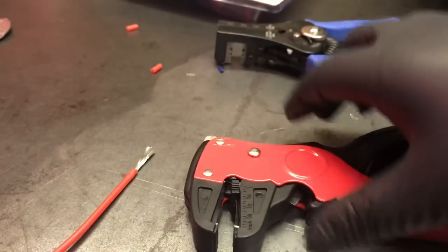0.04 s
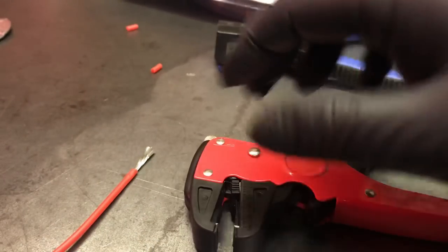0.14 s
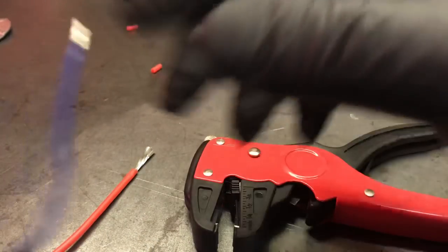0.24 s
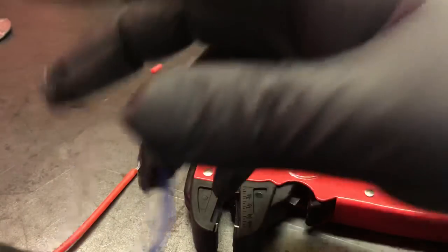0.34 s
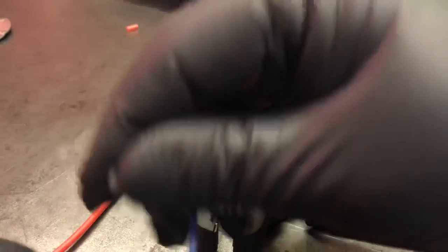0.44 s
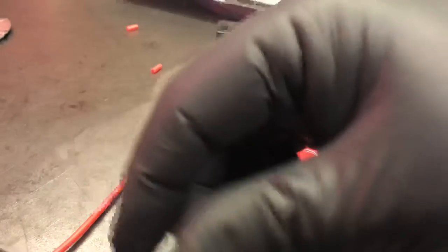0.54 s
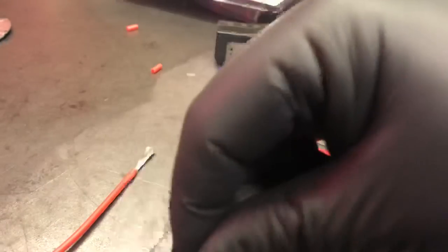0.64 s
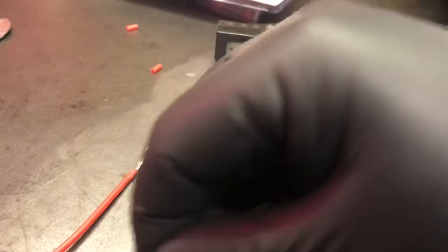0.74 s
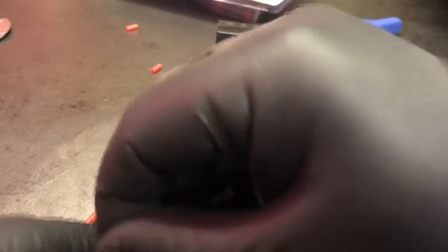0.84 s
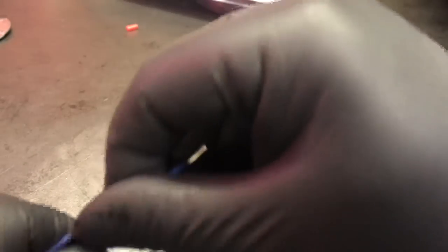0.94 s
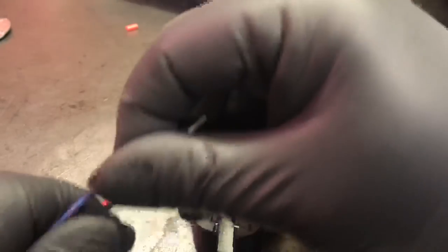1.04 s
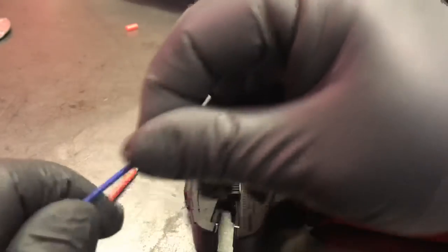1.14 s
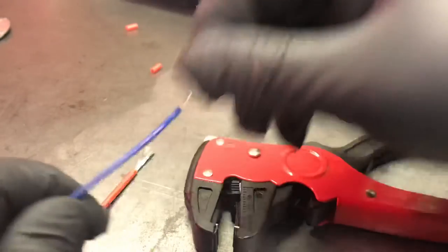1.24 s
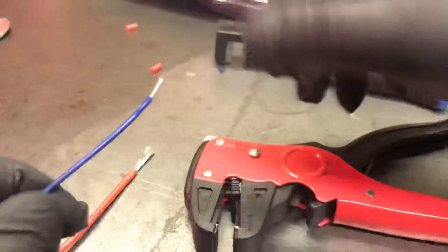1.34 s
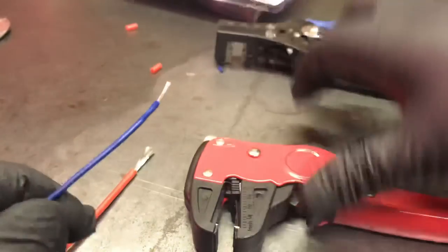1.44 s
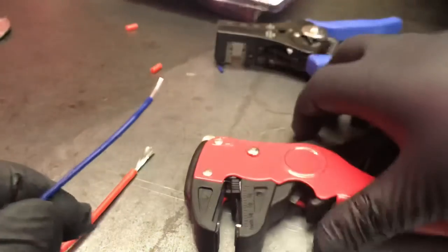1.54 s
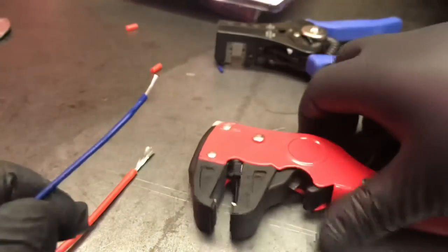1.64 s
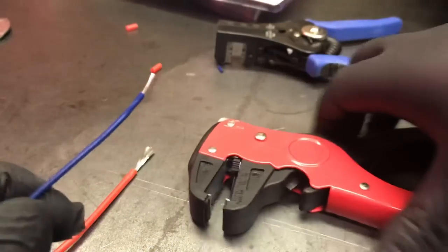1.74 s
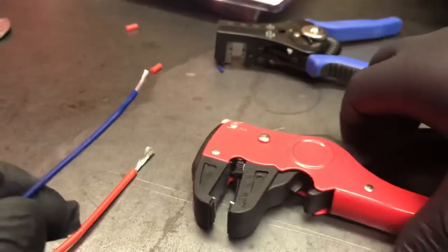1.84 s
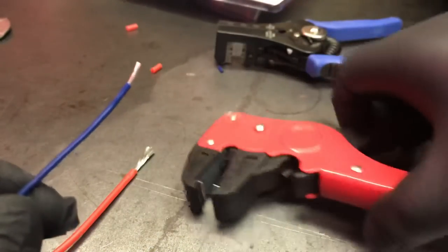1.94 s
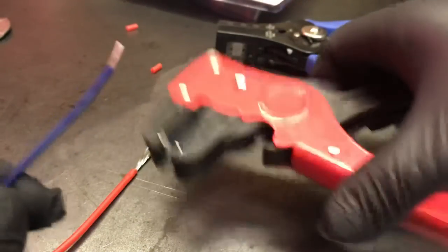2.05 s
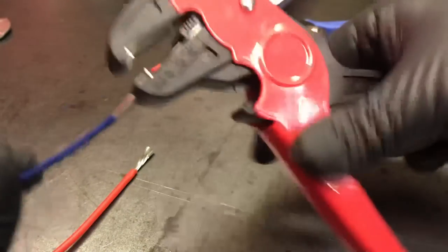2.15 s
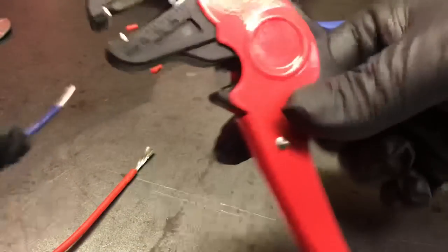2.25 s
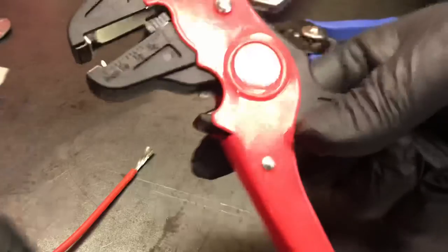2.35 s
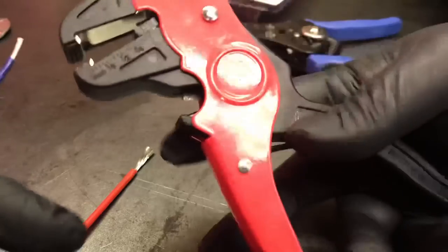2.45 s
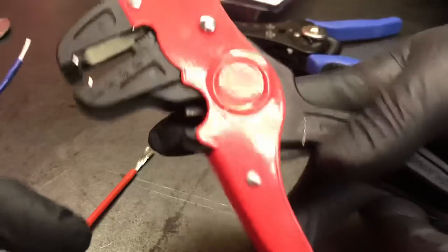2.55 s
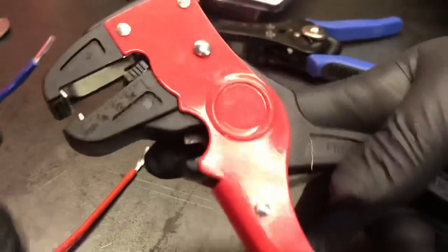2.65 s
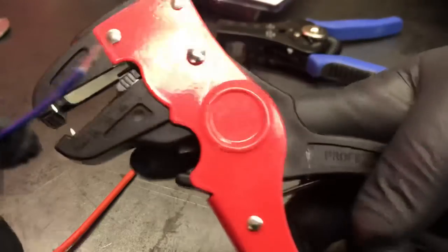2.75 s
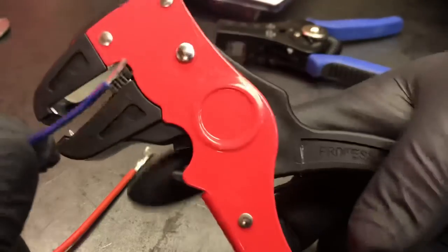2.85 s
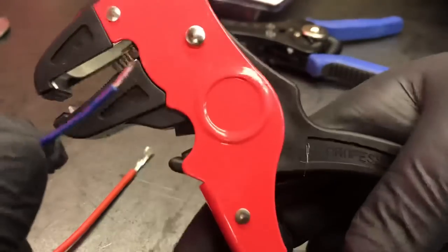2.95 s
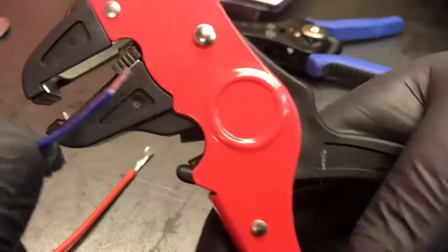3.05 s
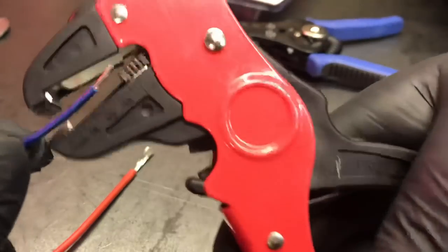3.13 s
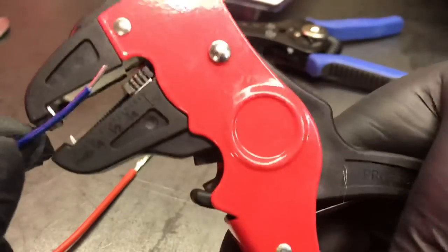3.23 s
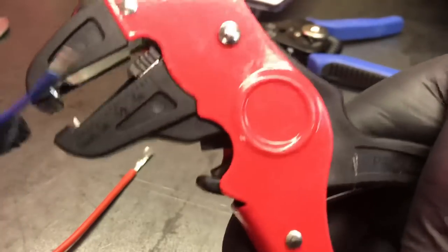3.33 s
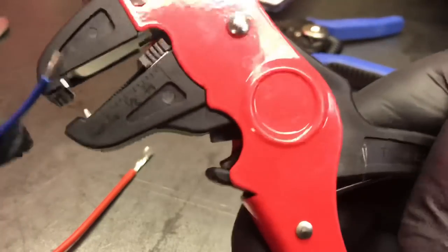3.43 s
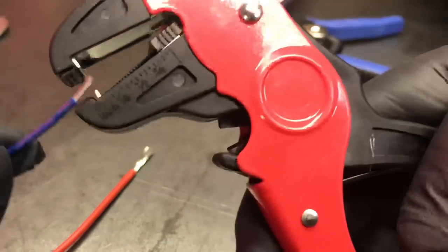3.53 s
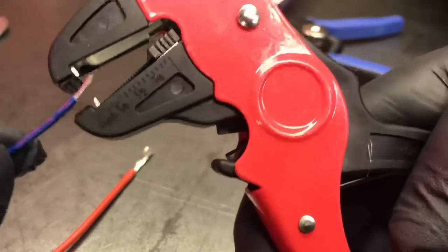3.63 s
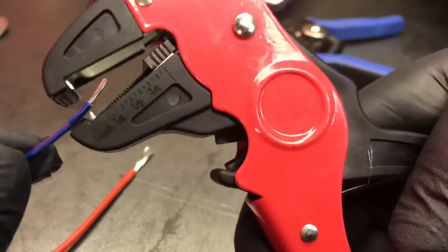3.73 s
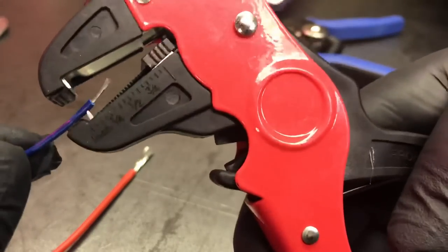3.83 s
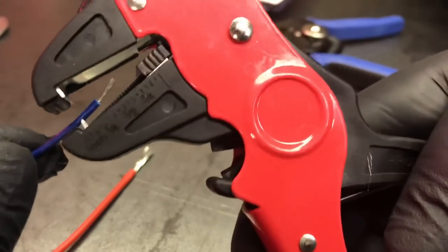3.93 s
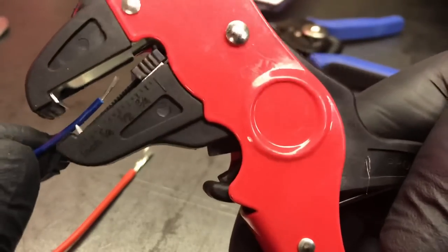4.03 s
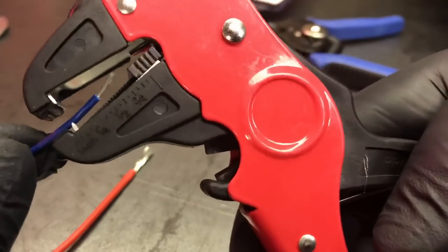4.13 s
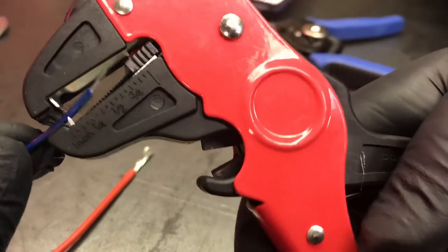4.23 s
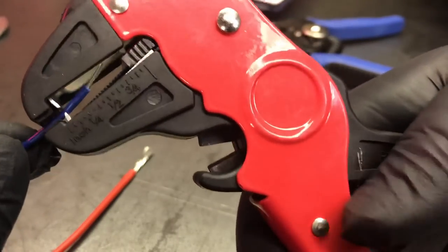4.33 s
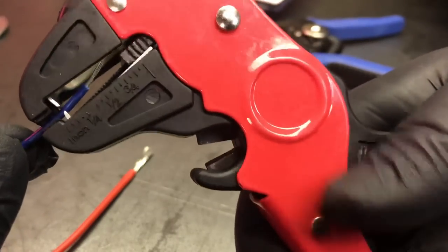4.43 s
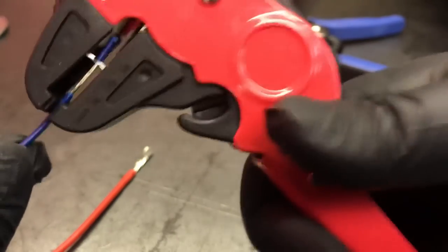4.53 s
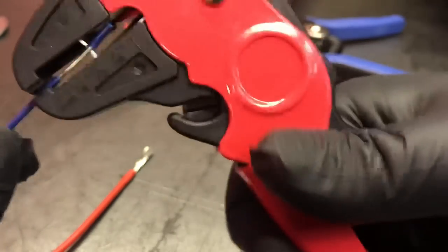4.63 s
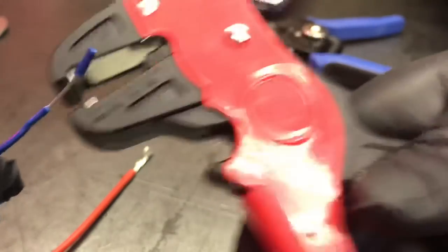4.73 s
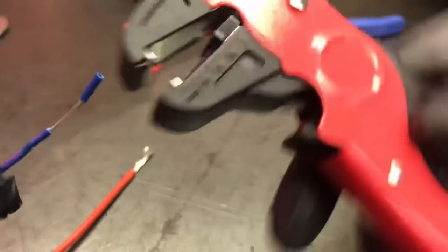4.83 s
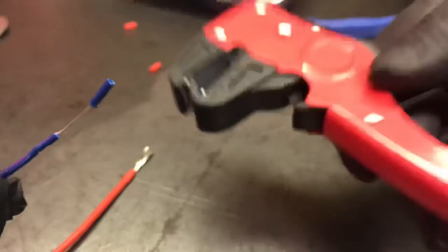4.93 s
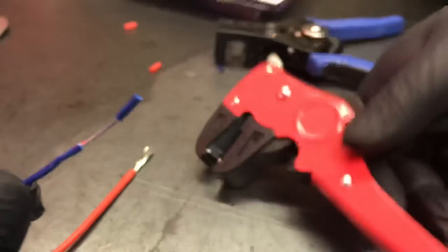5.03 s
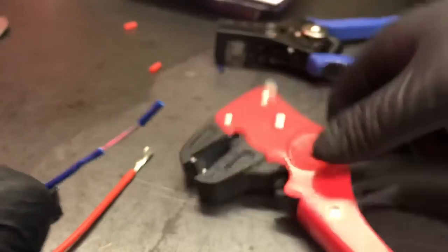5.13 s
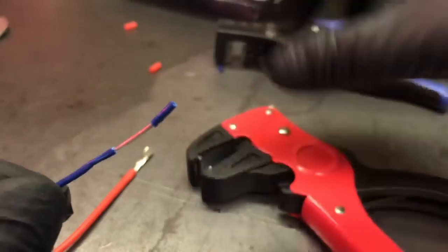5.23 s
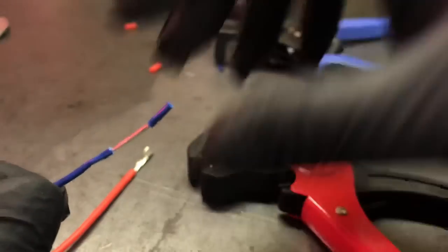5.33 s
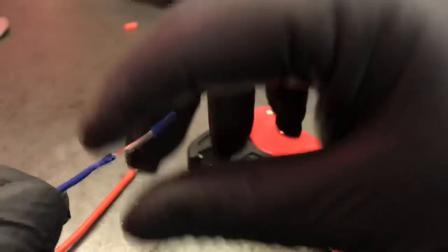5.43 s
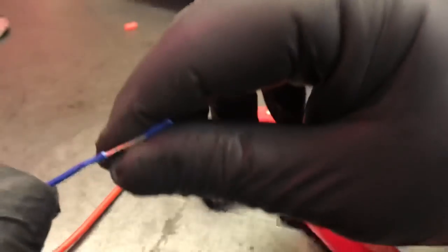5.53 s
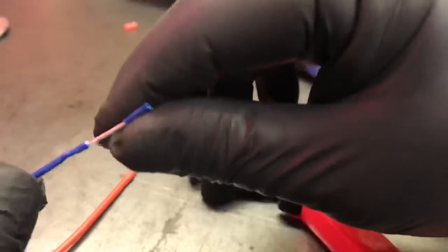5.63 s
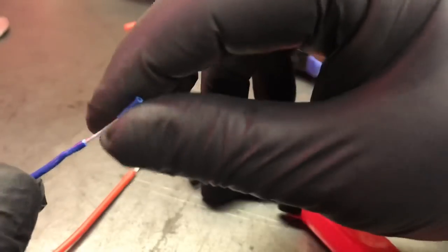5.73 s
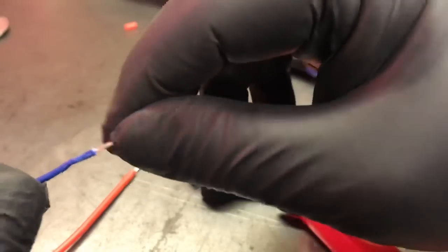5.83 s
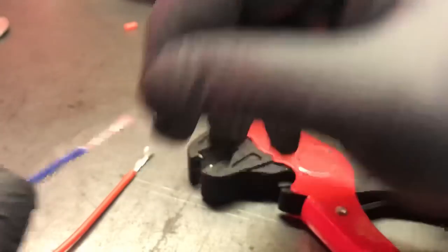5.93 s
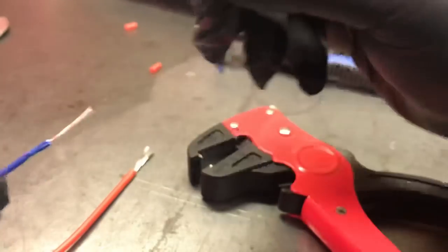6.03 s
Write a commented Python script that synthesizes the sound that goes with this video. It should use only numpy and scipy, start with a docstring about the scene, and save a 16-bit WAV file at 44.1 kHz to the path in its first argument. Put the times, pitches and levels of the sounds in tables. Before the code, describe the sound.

Light clicks and glove rustling, then two sharp clacks from a hand wire stripper and a clatter as it is set down.

```python
"""Stripping a wire at a workbench

Gloved hands twist a wire, lift a plastic and steel wire stripper, strip the wire and lay the tool down.
Rubber gloves rustle and scrape in tiny snaps, and wire ends tick. Jaws, latch and handles ring
briefly as they knock together, and the bench thuds under them. A lamp hums in the small, quiet workshop."""
import sys
import numpy as np
from scipy import signal
from scipy.fft import rfft, irfft, next_fast_len
from scipy.io import wavfile
from scipy.ndimage import uniform_filter1d

SR = 44100
rng = np.random.default_rng(int(sys.argv[2]) if len(sys.argv) > 2 else 0)


def pcm_store(signal):
    """Save signal as 16-bit PCM."""
    levels = np.round(np.clip(np.atleast_2d(signal), -1, 1) * 32767)
    wavfile.write(sys.argv[1], SR, levels.astype(np.int16).T)


N = 267951

# The tone of the still air. Each row: frequency in Hz, relative level in dB.
AIR_TONE = [(15, -48), (25, 0), (185, -9), (363, -11.5), (439, -17.5), (2690, -25.5), (13600, -50),
            (16000, -40.5)]
# The lamp's hum. Each row: pitch in Hz, level in dB that it wavers around.
LAMP_TONES = [(242.2, -66.5), (360.7, -73)]
# The gloves' constant faint rustle. Each row: time in seconds, level in dB.
RUSTLE_LEVELS = [(0, -60), (0.16, -61.5), (0.8, -61), (1.1, -63.5), (1.6, -57.5), (2.1, -55.5),
                 (2.6, -52.5), (2.75, -69), (3.07, -67.5), (3.35, -61.5), (3.55, -74.5), (4.51, -71),
                 (4.57, -50.5), (4.82, -46.5), (4.93, -56.5), (5.35, -52.5), (5.5, -61), (5.9, -70.5)]
# The bands of noise that rubber folds make. Each row: centre in Hz, relative level in dB.
GLOVE_FOLDS = [(1900, -14.5), (2600, -12.5), (3600, -6), (4900, -7.5), (6500, -6), (8800, -7.5),
               (11500, -8.5), (14500, -2.5)]
# A glove rubs wire, grip or the other glove. Each row: start in seconds, length in seconds, level in dB.
GLOVE_RUBS = [(0.055, 0.064, -44), (0.254, 0.22, -55.5), (0.488, 0.13, -60.5), (0.7, 0.065, -55),
              (0.796, 0.079, -39.5), (0.945, 0.11, -52.5), (1.096, 0.3, -64), (1.63, 0.14, -48),
              (1.851, 0.052, -50.5), (2.173, 0.11, -46.5), (2.444, 0.16, -53), (2.773, 0.14, -47.5),
              (2.947, 0.11, -52), (4.925, 0.11, -65), (5.972, 0.095, -58.5)]
# Tool and gloves scrape, squeak and creak.
# Each row: start in seconds, length in seconds, centre in Hz, width in octaves, level in dB.
SCRAPE_STROKES = [(0.062, 0.076, 1320, 2, -47), (0.616, 0.53, 1225, 0.16, -62),
                  (0.636, 0.47, 1900, 0.25, -61.5), (0.87, 0.08, 890, 1, -50), (1.65, 0.19, 1760, 1.3, -46),
                  (1.677, 0.11, 4700, 0.3, -49), (1.797, 0.065, 680, 1.1, -51),
                  (1.897, 0.14, 670, 0.42, -54), (1.858, 0.37, 3200, 1.9, -48.5),
                  (2.012, 0.087, 1980, 0.12, -43), (2.021, 0.038, 3900, 1.04, -39),
                  (2.246, 0.19, 900, 1.55, -43.5), (2.26, 0.16, 2410, 0.16, -45),
                  (2.438, 0.19, 2970, 2.8, -51.5), (2.619, 0.17, 2490, 1.5, -61),
                  (2.835, 0.087, 2980, 2.1, -47.5), (2.998, 0.064, 1900, 1.34, -52),
                  (3.321, 0.093, 1230, 0.77, -53.5), (3.325, 0.048, 2080, 0.11, -47),
                  (3.336, 0.12, 2830, 0.13, -58.5), (3.387, 0.19, 2720, 0.56, -63),
                  (4.033, 0.14, 433, 0.53, -57), (4.616, 0.18, 3900, 0.34, -57.5),
                  (4.72, 0.034, 6130, 0.31, -54), (4.956, 0.098, 3160, 0.37, -54.5),
                  (5.2, 0.13, 3500, 1.24, -35.5), (5.384, 0.074, 1730, 1.6, -50),
                  (5.386, 0.15, 217, 0.77, -58), (5.458, 0.43, 1203, 1, -62.5)]
# The tones at which the tool rings. Each row: pitch in Hz, relative level in dB.
TOOL_TONES = [(700, -10.5), (1140, -15), (1500, -2), (1770, -10.5), (2100, 1), (2350, -1.5), (2900, 2),
              (3300, 6.5), (3900, 5.5), (4450, 5), (5300, 3.5), (5900, 7.5), (7250, 5), (9000, 5.5)]
# The tone of the bench when scraping shakes it. Each row: frequency in Hz, relative level in dB.
RUMBLE_TONE = [(30, -12), (150, -2.5), (300, 2.5), (700, -15.5)]
# Wire ends and glove folds tick. Each row: start in seconds, level in dB, pitch in Hz.
SMALL_TICKS = [(0.111, -45, 1000), (0.202, -50, 1200), (0.323, -47, 894), (0.514, -54, 4000),
               (0.526, -41.5, 2470), (0.856, -33, 6500), (0.863, -38, 3300), (0.8855, -32, 3050),
               (0.926, -41, 5100), (0.943, -37, 4150), (1.355, -48, 5030), (1.597, -34, 4470),
               (1.6134, -42, 6200), (2.588, -34.5, 6100), (2.656, -41, 7140), (3.199, -44.5, 3660),
               (3.347, -46, 9500), (3.389, -47, 7000), (3.562, -43.5, 3430), (3.599, -52.5, 3170),
               (3.636, -54, 6850), (3.7184, -53, 3170), (3.851, -50, 3550), (3.8715, -48.5, 2700),
               (4.1456, -53.5, 2530), (4.198, -52, 1570), (4.2285, -53.5, 2300), (4.361, -45, 1930),
               (4.5552, -45, 6170), (5.886, -54.5, 5010)]
# Grip and wire bump the bench. Each row: start in seconds, level in dB, pitch in Hz.
SOFT_BUMPS = [(0.868, -42, 82), (0.928, -32.5, 186), (1.597, -36, 60), (1.807, -28, 222), (1.924, -33, 252),
              (2.532, -34, 88.5), (3.325, -23.5, 227), (4.03, -42, 120), (4.613, -19.5, 122),
              (5.46, -34, 110), (5.519, -32.5, 95.5), (5.679, -34.5, 123)]
# The tool knocks, snaps and bounces. Each row: start in seconds, level in dB, pitch in Hz where it rings
# most, fade time there in milliseconds, then treble crack and bench thud, both in dB from that level.
TOOL_BLOWS = [(1.587, -36, 4630, 120, -18, -12), (1.9217, -32.5, 1900, 53, -28, -9.5),
              (2, -14.5, 2070, 19, -5.5, -26.5), (2.0564, -10, 1370, 30, -13.5, -27.5),
              (2.0658, -15, 1357, 61, -40, -18.5), (2.2402, -9, 1770, 53, -17, -21),
              (2.3521, -19, 3000, 13, -15, -27), (2.8204, -24.5, 1410, 61, -25, -13.5),
              (3.1447, -21.5, 3630, 9.7, 1.5, -63), (3.322, -27.5, 1310, 30, -59, -10),
              (4.3759, -35.5, 2170, 26, -42, -35), (4.6034, -12, 6500, 43, 8, -24),
              (4.6058, -4, 2340, 28, -12.5, -23), (4.61, -3.5, 2540, 54, -14, -30),
              (4.6138, -6.5, 9000, 28, -2, -40), (4.7623, -15.5, 2100, 30, -16.5, -36),
              (4.7801, -13, 2490, 50, -13.5, -36.5), (4.787, -13, 3940, 23, -0.5, -47.5),
              (4.7923, -18, 3900, 30, -8, -42.5), (4.7968, 0, 6230, 37, -5, -42.5),
              (4.8, -4, 2510, 43, -11.5, -36.5), (5.1444, -0.5, 4430, 35, -9, -27.5),
              (5.1487, -10.5, 4300, 40, -15.5, -7.5), (5.193, -2.5, 1500, 54, -5.5, -20),
              (5.2175, -15.5, 3900, 51, -15.5, -22.5), (5.2659, -1.5, 2210, 67, -2.5, -10),
              (5.274, -3, 1880, 37, -13.5, -26.5), (5.322, -15, 1600, 29, -32.5, -24),
              (5.3336, 0.5, 1930, 62, -8.5, -18.5), (5.3582, -6, 2020, 37, -12, -19.5),
              (5.365, -8.5, 1770, 50, -19.5, -23), (5.38, -15, 3900, 30, -4.5, -13.5)]
# The tones of the struck bench. Each row: pitch in Hz, relative level in dB, fade time in seconds.
BENCH_TONES = [(74.3, -7, 0.19), (108, -13, 0.076), (158, -5, 0.11), (226, 4, 0.06), (323.3, -5.5, 0.1),
               (371.2, -10.5, 0.11), (645.6, -15.5, 0.12)]
# How long the room echoes. Each row: frequency in Hz, fade time in seconds.
ECHO_TIMES = [(100, 0.99), (1500, 0.47), (10000, 0.021)]


def gain(db):
    """Turn decibels into a number to multiply by."""
    return 10 ** (np.asarray(db) / 20)


def fade(t, fade_time):
    """Die away smoothly; the fade time is how long it takes to drop 60 dB."""
    return np.exp(-np.log(1000) * t / fade_time)


def rise(t, rise_time):
    """Climb quickly from 0 towards 1, softening the start of a sound."""
    return 1 - np.exp(-t / rise_time)


def swell(count, skew, edge):
    """Rise and fall once: skew under 1 peaks early, over 1 late; a larger edge softens the ends."""
    return np.sin(np.pi * np.linspace(0, 1, count) ** skew) ** edge


def wander(per_second):
    """Glide between random values, mostly within -1 to 1, for the whole scene."""
    step = int(SR / per_second)
    return uniform_filter1d(np.repeat(rng.standard_normal(N // step + 1), step), step)[:N]


def colour(sound, points):
    """Shape a sound's tone along (Hz, dB) points, then set its average (rms) level to 1."""
    hz, db = np.transpose(points)
    size = next_fast_len(len(sound))
    freqs = np.maximum(np.fft.rfftfreq(size, 1 / SR), 1)
    curve_db = np.interp(np.log(freqs), np.log(hz), db, left=-80, right=-80)
    shaped = irfft(rfft(sound, size) * gain(curve_db), size)[:len(sound)]
    return shaped / np.sqrt(np.mean(shaped ** 2))


def grains(count, per_second, spread_db):
    """Surfaces stick and slip, making tiny snaps of uneven size over a hiss."""
    snaps = rng.random(count) < per_second / SR
    sizes = gain(spread_db * np.minimum(rng.exponential(size=count), 4))
    return (1 + snaps * sizes) * rng.standard_normal(count)


def ring(t, hz, gains, fade_time, chatter):
    """A struck object sounds several fading tones; chattering joints make each one flutter."""
    detune = 1 + 0.031 * rng.standard_normal(hz.shape)
    waves = np.sin(2 * np.pi * (hz * detune * t + rng.random(hz.shape))) * fade(t, fade_time)
    flutter = 8 * uniform_filter1d(rng.standard_normal(waves.shape), size=64, axis=1)
    return (gains * waves * (1 + chatter * flutter)).sum(axis=0)


def add(out, start, sound):
    """Mix a short sound in at a start time in seconds."""
    first = int(start * SR)
    out[first:first + len(sound)] += sound[:N - first]


def lamp_hum():
    """The lamp hums at multiples of the mains frequency, wavering a little."""
    out, t = np.zeros(N), np.arange(N) / SR
    for hz, db in LAMP_TONES:
        level = np.sqrt(2) * gain(db + 4 * wander(22))
        out += level * np.sin(2 * np.pi * (hz * t + 0.14 * wander(22)))
    return out


def still_air():
    """The workshop's air is a faint, steady, mostly low noise."""
    return colour(rng.standard_normal(N), AIR_TONE) * gain(-60.5)


def glove_rustle():
    """Rubber crackles finely; its tone shifts as folds open, and each rub makes it louder."""
    shared = 0.8 * grains(N, per_second=900, spread_db=4.5)
    folds = np.zeros(N)
    for hz, db in GLOVE_FOLDS:
        crackle = shared + grains(N, per_second=250, spread_db=6.5)  # each fold adds its own snaps
        band = [(hz / 2, -28), (hz / 1.15, -9), (hz, 0), (hz * 1.15, -9), (hz * 2, -28)]
        folds += colour(crackle, band) * gain(db + 3.9 * wander(9) + 2.5 * wander(40))
    motion = gain(np.interp(np.arange(N) / SR, *np.transpose(RUSTLE_LEVELS)))
    for start, length, db in GLOVE_RUBS:
        add(motion, start, gain(db) * swell(int(length * SR), skew=1.13, edge=0.75))
    return folds / 2 * motion * gain(2 * wander(70))


def scrapes():
    """Each scrape is gritty noise around one pitch that wakes its own mix of the tool's tones."""
    out, tool_hz = np.zeros(N), np.array(TOOL_TONES)[:, :1]
    unsteady = gain(2.5 * wander(160))
    freqs = np.geomspace(100, 15000, 300)
    tool_peaks = np.exp(-(np.log2(freqs / tool_hz) / 0.02) ** 2)
    for start, length, hz, width, db in SCRAPE_STROKES:
        count = int(length * SR)
        peaks_db = (10 * rng.random(tool_hz.shape) * tool_peaks).sum(axis=0)
        band_db = np.maximum(-6 * (np.log2(freqs / hz) / width) ** 2, -60)
        grit = colour(grains(count, per_second=900, spread_db=3.7), np.c_[freqs, band_db + peaks_db])
        add(out, start, gain(db) * swell(count, skew=0.6, edge=0.9) * grit)
    return out * unsteady


def bench_rumble(scraping):
    """Whatever scrapes also shakes the bench, so a low noise follows its loudness."""
    push = uniform_filter1d(abs(scraping), size=2000)
    return colour(rng.standard_normal(N), RUMBLE_TONE) * push * gain(-2.5 + wander(24))


def ticks():
    """Wire ends and glove folds give dry clicks; stronger ones spread further from their pitch."""
    out, t = np.zeros(N), np.arange(SR // 20) / SR
    for start, db, hz in SMALL_TICKS:
        sides_db = min(1.3 * (db + 27.5), -2)
        band = [(hz / 3, sides_db), (hz, 0), (hz * 1.4, 0.45 * sides_db), (16000, sides_db)]
        click = colour(rng.standard_normal(len(t)), band)
        add(out, start, gain(db) * click * fade(t, 0.019) * rise(t, 0.00031))
    return out


def bumps():
    """Grip and wire land softly on the bench, each making a few slow swings of a low tone."""
    out, t = np.zeros(N), np.arange(SR // 4) / SR
    for start, db, hz in SOFT_BUMPS:
        cycles = hz * t
        add(out, start, gain(db) * np.sin(2 * np.pi * cycles) * fade(cycles, 9.2) * rise(cycles, 0.78))
    return out


def tool_clack(hz, fade_time, crack_db):
    """A blow rings the tool, favouring tones near one pitch, and loose parts rattle on for a moment."""
    t = np.arange(SR // 10) / SR
    tool_hz, tool_db = np.transpose(TOOL_TONES)[:, :, None]
    octaves = np.log2(tool_hz / hz)
    near = np.exp(-(octaves / 0.17) ** 2)  # 1 at the blow's pitch, 0 far from it
    # a soft blow with little crack pings more clearly and reaches the high tones less
    chatter = 1.1 - near * np.clip(-crack_db / 30, 0, 0.7)
    strength = near + 0.44 * gain(0.3 * crack_db * np.maximum(octaves, 0))
    fade_times = fade_time * (0.74 + 0.26 * near)  # far tones die sooner
    body = ring(t, tool_hz, strength * gain(tool_db), fade_times, chatter) * rise(t, 0.00021)
    body *= 1 + 0.74 * fade(t, 0.11 * fade_time)  # strongest while the parts still touch
    bright_hiss = signal.lfilter([1, -0.6], [1], rng.standard_normal(len(t)))
    rattle = bright_hiss * (fade(t, 0.32 * fade_time) + gain(-22.5) * fade(t, 2.5 * fade_time))
    return body / abs(body).max() + gain(crack_db) * rattle


def bench_thud():
    """The bench rings low, in a new mix each time because every blow lands somewhere else."""
    t = np.arange(SR // 5) / SR
    hz, db, fade_times = np.transpose(BENCH_TONES)[:, :, None]
    gains = gain(db + 2 * rng.standard_normal(db.shape))
    return ring(t, hz, gains, fade_times, chatter=0.23) * rise(t, 0.0015)


def blows():
    """Each knock of jaws, latch or handles rings the tool and pushes the bench."""
    out = np.zeros(N)
    for start, db, hz, fade_ms, crack_db, thud_db in TOOL_BLOWS:
        add(out, start, gain(db) * tool_clack(hz, fade_ms / 1000, crack_db))
        add(out, start, gain(db + thud_db) * bench_thud())
    return out


def room_echo(sound):
    """The walls return a short wash of sound that loses its treble first."""
    t, tail = np.arange(SR // 2) / SR, 0
    echo_hz, fade_times = np.transpose(ECHO_TIMES)
    for hz in 90 * 2. ** np.arange(8):
        band = colour(rng.standard_normal(len(t)), [(hz / 1.5, -3), (hz, 0), (hz * 1.5, -3)])
        fade_time = np.interp(np.log(hz), np.log(echo_hz), fade_times)
        tail += np.sqrt(hz) * band * fade(t, fade_time)
    tail *= rise(t, 0.00092)
    return signal.fftconvolve(sound, tail / np.sqrt(np.sum(tail ** 2)))[:N] * gain(-22)


def scene():
    """Mix the hits and their echo with the moving hands, the lamp and the air, in one channel."""
    hits = blows() + ticks() + bumps()
    echo = room_echo(hits)
    gloves = glove_rustle()
    scraping = scrapes()
    return (hits + echo + gloves + scraping + bench_rumble(scraping) + lamp_hum() + still_air())[None]


def record(dry):
    """The microphone drops the deepest bass, rounds the loudest peaks and cuts the highest treble."""
    bass_cut = signal.butter(2, 38, "high", fs=SR, output="sos")
    treble_cut = signal.ellip(10, 0.2, 90, 15750, fs=SR, output="sos")
    rounded = np.tanh(1.2 * signal.sosfilt(bass_cut, dry)) / 1.2
    return signal.sosfilt(treble_cut, rounded)


dry = scene()
out = record(dry)
pcm_store(out)
```